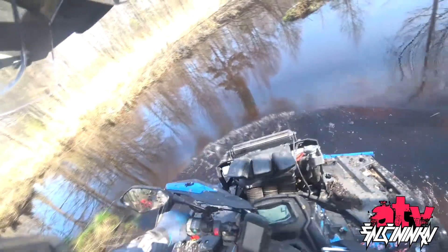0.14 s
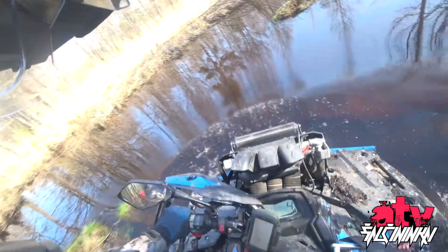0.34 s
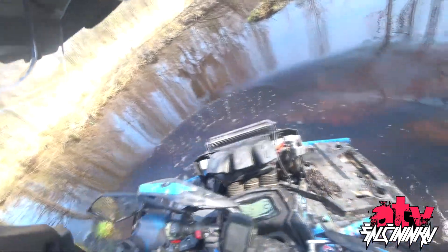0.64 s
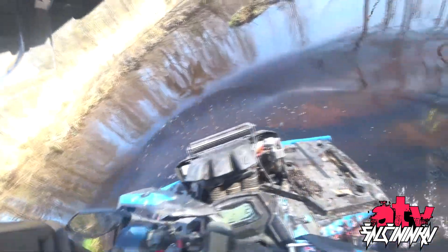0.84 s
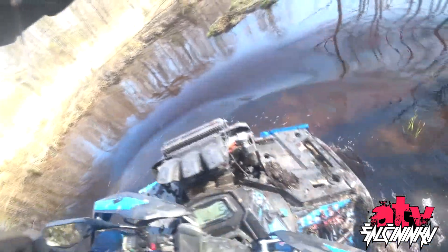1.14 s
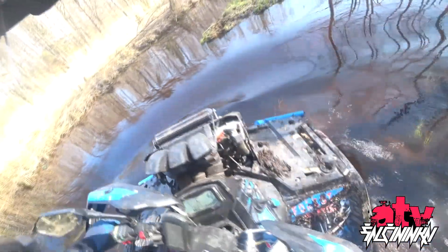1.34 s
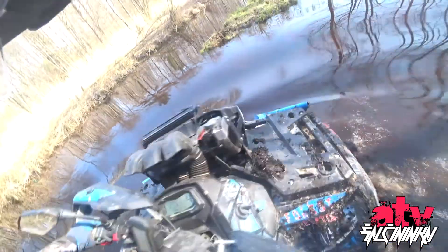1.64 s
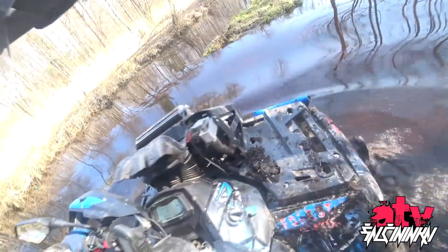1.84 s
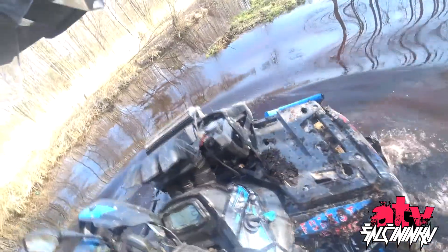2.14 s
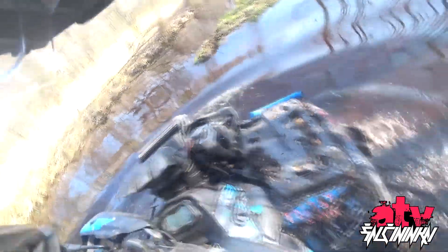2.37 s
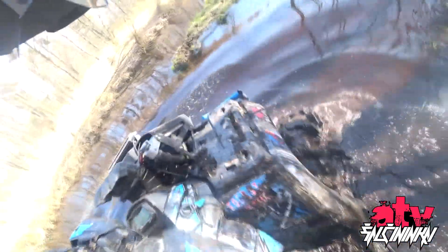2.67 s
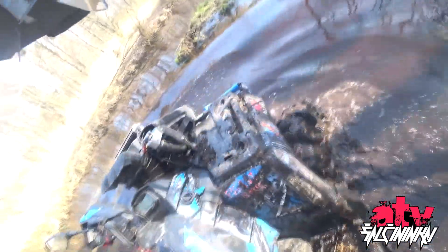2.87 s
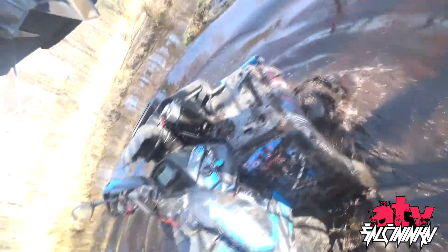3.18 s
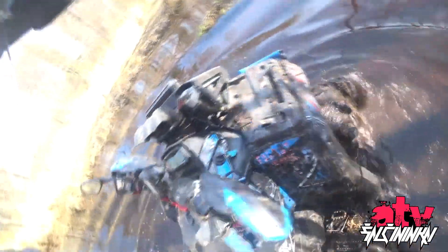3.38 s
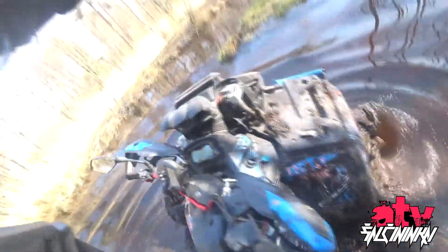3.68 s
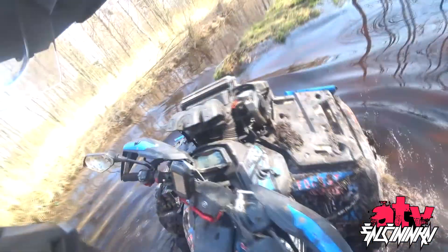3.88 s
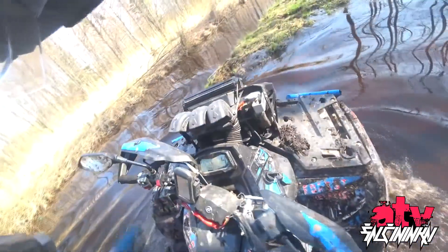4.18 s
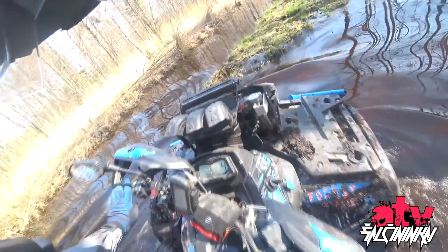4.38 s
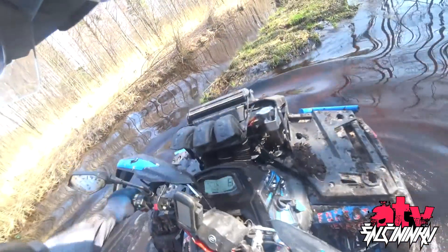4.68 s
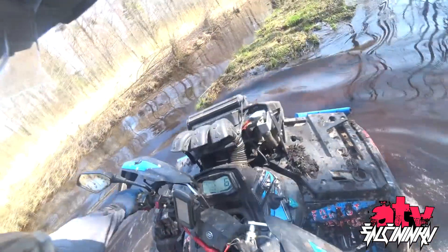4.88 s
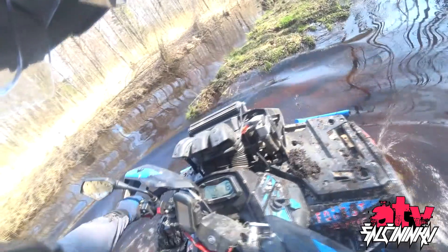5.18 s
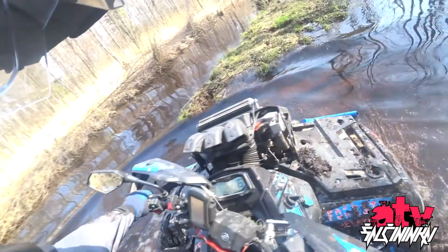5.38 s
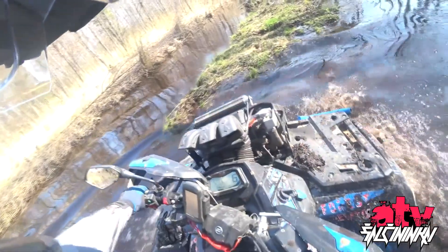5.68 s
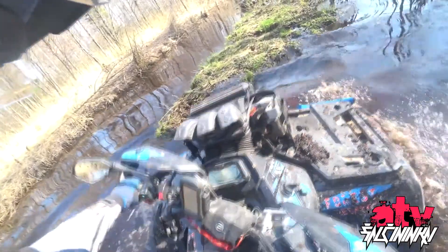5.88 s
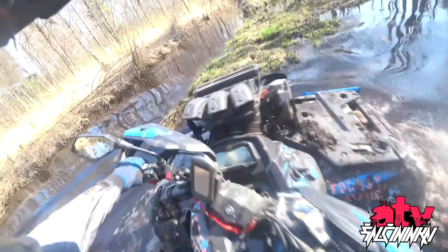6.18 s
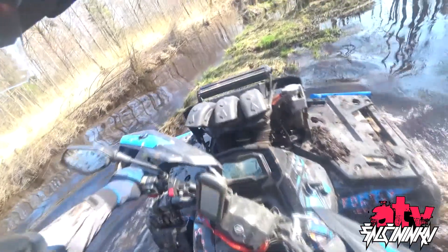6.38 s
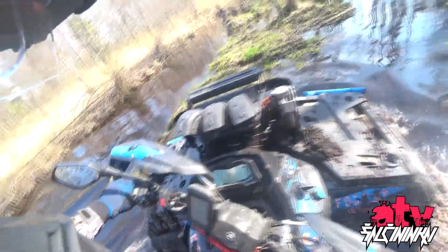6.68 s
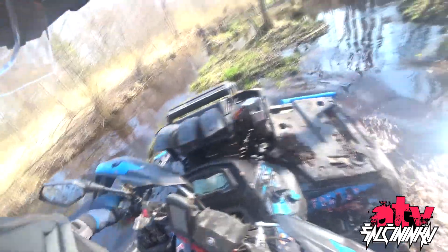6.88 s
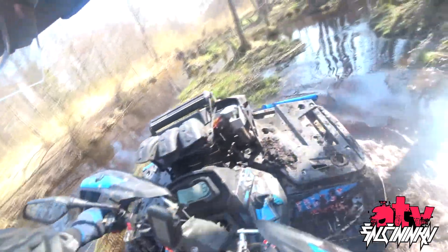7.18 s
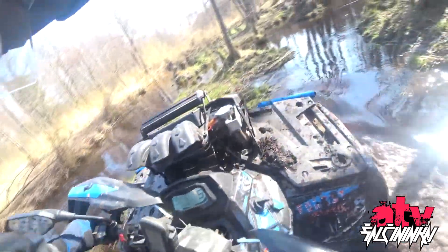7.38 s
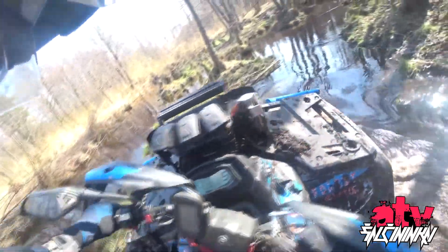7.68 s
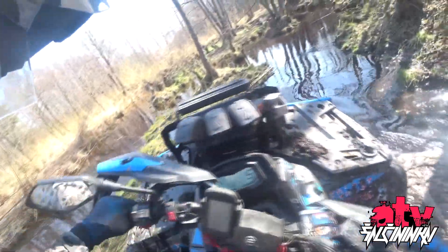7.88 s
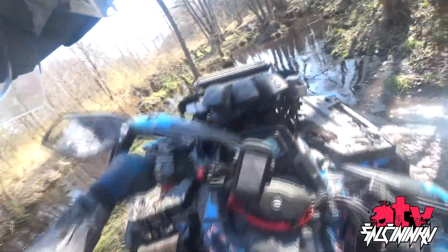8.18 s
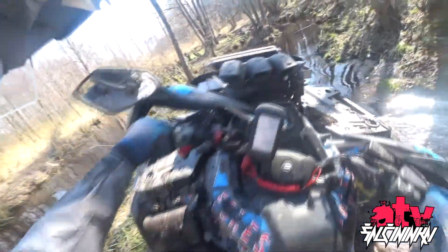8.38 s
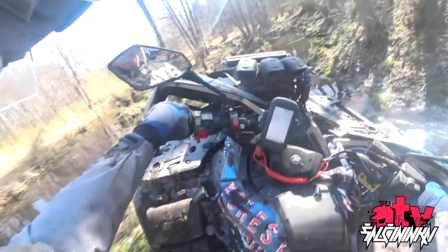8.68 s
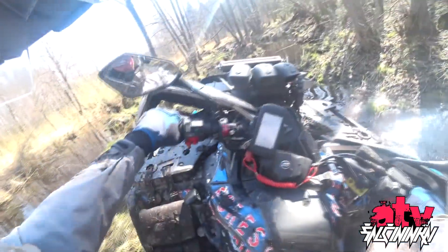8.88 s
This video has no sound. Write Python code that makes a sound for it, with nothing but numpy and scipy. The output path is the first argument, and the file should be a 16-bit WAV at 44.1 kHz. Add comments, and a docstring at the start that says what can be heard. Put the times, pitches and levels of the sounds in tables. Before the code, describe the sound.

A two-cylinder quad bike growls and rattles through flood water, whining at times, while water churns, slaps and gulps against the bodywork.

```python
"""A two-cylinder quad bike wades through flood water, heard by a small camera in a closed housing.
From the start, uneven firings hum in the exhaust as tones and knock ringing frame, panels and racks, over churning
noise; a whine soon takes hold at times, then gulps and puffs of water slap the body and single drops tick.
From about five seconds the engine works harder and the water churns more; late on, brief bands of hiss swell.
The two microphone ports hear each resonance with its own balance and phase."""
import sys
import numpy as np
from scipy import signal
from scipy.io import wavfile
from scipy.ndimage import uniform_filter1d

SR = 44100
rng = np.random.default_rng(int(sys.argv[2]) if len(sys.argv) > 2 else 0)


def unload_audio(sound):
    """Save the sound as a 16-bit wav file, at the path given as the first command line argument."""
    columns = np.transpose(np.atleast_2d(sound))
    # keep every value between -1 and 1, then stretch to whole-number steps
    steps = np.round(np.clip(columns, -1, 1) * 32767)
    wavfile.write(sys.argv[1], SR, steps.astype(np.int16))


def how_loud(loudness_db):
    """Turn decibels into a plain amplitude multiplier (0 dB gives 1, 20 dB gives 10)."""
    steps = np.asarray(loudness_db, float) / 20
    return 10 ** steps


N = 398223
TIME = np.arange(N) / SR

# engine speed: (time [s], rate of the four-stroke cycle [cycles/s])
ENGINE_SPEED = [(0.0, 17.45), (0.34, 21.32), (0.65, 20.39), (0.8, 24.99), (1.3, 25.87), (1.4, 22.41),
                (2.25, 18.38), (2.44, 23.76), (2.74, 22.54), (3.49, 22.63), (3.69, 23.73), (4.24, 22.9),
                (4.75, 25.61), (4.94, 28.98), (5.15, 28.87), (5.37, 31.6), (5.98, 26.13), (6.31, 29.68),
                (6.59, 25.89), (7.36, 27.33), (7.75, 25.08), (8.04, 24.63), (8.2, 20.38), (8.43, 19.22),
                (8.6, 25.77), (8.71, 27.78), (9.03, 26.17)]
# throttle: (time [s], load [dB], looseness of the rattling metal [dB], knock against the steady shaking [dB])
THROTTLE = [(0, -6, -16.5, 4), (.5, -7.5, -16, 9.5), (.75, -5, -8, 3.5), (1.15, -3, -0.5, 7.5),
            (1.35, -4.5, -7, 9), (1.5, -1, -11.5, 5), (1.75, -4.5, -14, -20), (1.95, -10.5, -18, -3),
            (2.185, -11.5, -13, 6), (2.205, -14.5, -7, 15), (2.45, -5, -11, 8.5), (3.3, -6, -7.5, 3.5),
            (4.15, -4.5, -5.5, 3.5), (4.6, -3, -0.5, 5), (5.1, 0, -5, 7.5), (5.5, -0.5, -1.5, 5.5),
            (6.0, -1, 1.5, 9), (6.5, -2, 1, 4.5), (7.55, -0.5, -2, 10), (7.85, -5.5, -1, 9.5),
            (8.05, -3.5, -1, 5.5), (8.09, -4, -5, 4), (8.28, -5.5, -7, 13.5), (8.42, -5, -8, 17),
            (8.55, -0.5, -10.5, 9.5), (9.03, -2, -8.5, 10.5)]
# how hard the wheels churn the water: (time [s], level [dB])
WHEEL_CHURN = [(0, -10), (.5, -11.5), (1.2, -3), (1.45, -6.5), (2.15, -8.5), (2.75, -4.5), (3.8, -3),
               (4.15, -6), (5.5, 1.5), (6.35, -2), (6.95, 0.5), (7.6, -1), (8.2, -7.5), (8.8, -1),
               (9.03, -3.5)]
# spells in which the whine takes hold: (start [s], length [s], boost [dB], pitch [Hz])
WHINE_SPELLS = [(.8, 0.57, 3, 712), (2.3, 1.9, 7, 711), (5.45, 0.22, 7.5, 702), (6.55, 1.126, 6.5, 709),
                (8.45, 0.71, 7.5, 694.7)]


def evened(x):
    """Scales to rms 1."""
    return x / np.sqrt(np.mean(np.abs(x) ** 2) + 1e-20)


def curve(rows, column):
    """One column of a table, joined by straight lines sample by sample."""
    rows = np.array(rows)
    return np.interp(TIME, rows[:, 0], rows[:, column])


def hold(start, length):
    """Rises, holds and falls: 0 to 1."""
    rise_s, fall_s = 0.11, 0.06
    rise = (TIME - start) / rise_s + 0.5
    fall = (start + length - TIME) / fall_s + 0.5
    return np.clip(np.minimum(rise, fall), 0, 1)


def spells(rows):
    """Sum in dB of all spells."""
    return sum(db * hold(start, length) for start, length, db, *_ in rows)


def strength(part):
    """Gain of a part from load, looseness and its own spells."""
    # each part: (gain where load and looseness are 0 dB [dB], share of load, share of looseness)
    follows = {"exhaust": (-43.5, 0.85, 0.06), "frame": (-35.5, 1, 0.046), "panels": (-38.5, 0.9, 0.29),
               "rack": (-41.5, .05, 0.9), "bracket": (-44, 0.25, 0.97), "clatter": (-48.5, 0.059, 1),
               "low bar": (-48.5, 0.71, 0.49), "high bar": (-48.5, .05, 0.75), "whine": (-48, 0.68, .05)}
    # spells in which one part buzzes harder: (start [s], length [s], boost [dB])
    buzzes = {"exhaust": [(6.3, 0.72, 3), (8.45, .3, 4)], "frame": [(0, 0.26, 1), (8.5, .6, 0.5)],
              "panels": [(5.0, 0.53, 3)], "rack": [(.55, 0.31, 6.5), (3.65, 0.42, 6), (4.35, 0.18, 6),
              (6.55, 1.33, 3), (8.2, 0.22, 0)], "bracket": [(.95, 0.35, 4), (4.0, 0.29, 3), (5.35, 0.21, 7),
              (5.85, 1.36, 5.5)], "clatter": [(0, 0.81, 5), (5.3, 1.0, 2.5), (7.6, .45, 2),
              (8.45, 0.73, 12)], "low bar": [(.8, 0.66, 3.5), (6.1, .4, 0)], "high bar": [(2.45, 2.35, 5.5),
              (6.8, 0.73, 3)]}
    db, of_load, of_loose = follows[part]
    load, looseness = curve(THROTTLE, column=1), curve(THROTTLE, column=2)
    own_db = spells(buzzes.get(part, WHINE_SPELLS))
    return how_loud(db + of_load * load + of_loose * looseness + own_db)


def hiss_drive():
    """Steady white noise that sets a resonance ringing."""
    return rng.standard_normal(N)


def ring(drive, modes):
    """Resonances, each calling for its own drive and reaching the two ports with its own balance and phase."""
    out = np.zeros((2, N))
    for hz, width, db, balance_db, lead in modes:
        turn = np.exp(2j * np.pi * np.cumsum(hz * np.ones(N)) / SR)  # the pitch may move
        poles = np.exp(-np.pi * width * np.array([1, 4, 6]) / SR)
        # shift the resonance down to 0 Hz, filter there, shift it back
        lowered = signal.lfilter([1], np.poly(poles), drive() * turn.conj())
        ringing = evened(turn * lowered)
        balance = how_loud([balance_db / 2, -balance_db / 2])
        phase = np.exp([0.5j * lead, -0.5j * lead]) * np.exp(2j * np.pi * rng.random())
        ports = balance * phase
        out += how_loud(db) * (ports[:, None] * ringing).real
    return evened(out)


def firings(cycles, spread_db):
    """One click a firing, of uneven size; rows are the cylinders."""
    # where in the four-stroke cycle each cylinder fires: [share of a cycle]
    firing_points = [.18, .53]
    out = np.zeros((2, N))
    for row, share in zip(out, firing_points):
        at = np.flatnonzero(np.diff(np.floor(cycles - share)))
        row[at] = how_loud(spread_db * rng.standard_normal(400))[:len(at)]
    return out


def exhaust(cycles):
    """Clean orders of the cycle rate, wavering in level and coloured by pipe and frame."""
    # harmonics of the engine: (multiple of the cycle rate, relative level [dB])
    engine_orders = [(4, -4), (5, 13.5), (6, 8), (7, -.5), (8, 4), (9, 4), (10, -1), (11, 3), (12, 0),
                     (13, 2.5), (14, 8.5), (15, -6), (16, 2.5), (17, 2.5), (18, -5), (19, -1), (20, .5),
                     (21, -7), (22, 2), (23, -5), (24, -1.5), (25, -1), (26, -2), (27, -1), (28, -2),
                     (29, -4), (30, -2), (31, -7)]
    # colour of pipe and frame: (frequency [Hz], relative level [dB], phase by which left leads [rad])
    pipe_colour = [(90, -13, -.3), (120, -9, -.4), (150, -13.5, -.4), (170, -6, -.3), (187, 5, -.2),
                   (205, 1, -.4), (235, 2, -1.1), (270, -12, 0), (320, -6, .5), (370, -6, .2),
                   (440, -8, .7), (520, -3.5, 1.2), (570, 7, 1.7), (630, 7, 2.6), (700, 18, 2.6),
                   (760, 13, 2.8), (860, 0, 2.6)]
    pipe_hz, pipe_db, pipe_lead = np.transpose(pipe_colour)
    out = np.zeros((2, N))
    for order, db in engine_orders:
        waver = np.interp(TIME, np.arange(60) / 6, rng.standard_normal(60))
        hz = order * curve(ENGINE_SPEED, column=1)
        lead = np.interp(hz, pipe_hz, pipe_lead) * np.array([[0.5], [-0.5]])
        level = how_loud(db + np.interp(hz, pipe_hz, pipe_db) + 3 * waver)
        out += level * np.cos(2 * np.pi * (order * cycles + rng.random()) + lead)
    return strength("exhaust") * evened(out) * how_loud([[-0.8], [0.8]])


def pipe_boom():
    """A low resonance of the pipe under noise, louder while the engine gains speed."""
    gained = np.maximum(np.gradient(curve(ENGINE_SPEED, column=1)) * SR, 0)
    pickup = uniform_filter1d(gained, size=4000)  # cycles/s gained each second
    return how_loud(-63 + 0.2119 * pickup) * ring(hiss_drive, [(181.5, 20, 0, -4.0, -0.22)])


def shaking(clicks, first_db, depth, decay_s, clean):
    """A sharp blow at each firing, plus noise that bursts with it and dies back to a steady rattle."""
    # spells in which the first cylinder knocks softer or harder: (start [s], length [s], change [dB])
    first_knock = [(.6, 1, 0.5), (2.3, .4, -0.5), (3.2, .6, 1.5), (5.0, 0.74, -2), (8.15, 0.285, -21)]
    t = np.arange(2000) / SR
    burst = (1 - np.exp(-t / 0.00054)) * np.exp(-t / decay_s)
    blows = clicks[0] * how_loud(first_db + spells(first_knock)) + clicks[1]
    blows = blows * depth * how_loud(curve(THROTTLE, column=3))
    swell = 1 + signal.oaconvolve(blows, burst)[:N]
    steady = 1 / np.sqrt(uniform_filter1d(swell ** 2, 6000))  # evens out the slower level
    return lambda: steady * (swell * rng.standard_normal(N) + clean * blows)


def bodywork(clicks):
    """Each metal or plastic part rings with the knocks, at its own depth and level."""
    # resonances of each part:
    # (pitch [Hz], width [Hz], relative level [dB], left over right [dB], phase by which left leads [rad])
    frame = [(501, 68, -17, 2, 0.3), (567.3, 28, -9, 4, 1.4), (693, 48.4, 0, -5, 2.84),
             (737, 41, -2.5, -0.5, 2.9), (777, 44, -6, 3, 2.68), (900, 53, -13.5, 9, 1.85)]
    panels = [(951, 65, -7.5, 5.8, 3), (1149, 70, -7.5, 2.4, -1.43), (1263, 43, -2.5, 3.2, -2.5),
              (1380, 310, -22, 0.69, -2), (1436, 55, 0, 0.71, -3)]
    rack = [(1705.6, 41.7, -2.5, 0.5, 1.65), (1944, 146, -9, -6.5, 3.46)]
    bracket = [(2042, 39, -2, -1.1, 2.71), (2204, 74, -9, -1, 3.92)]
    clatter = [(2624, 92, -9.5, -10, 0.5), (2680, 62, 5, 5.5, 3.5), (2866, 100, 7, -0.5, 2.0),
               (3405, 115, -10, 5, -2)]
    low_bar = [(1600.4, 49, 0, 3.4, 0.3)]
    high_bar = [(1823.6, 33.7, 0, 3.0, 1.0)]
    # (name, resonances, first cylinder dB, burst depth, burst decay s, weight of the sharp blow)
    parts = [("frame", frame, -1.5, 0.52, 0.005, 40),
             ("panels", panels, -0.6, 0.4, 0.005, 14),
             ("rack", rack, -0.6, 0.9, 0.004, 40),
             ("bracket", bracket, -5, 1.1, 0.004, 32),
             ("clatter", clatter, 1.5, 0.8, 0.004, 18),
             ("low bar", low_bar, 0, 0.6, 0.005, 40),
             ("high bar", high_bar, 0, 0.5, 0.0045, 45)]
    return sum(strength(name) * ring(shaking(clicks, *how), modes) for name, modes, *how in parts)


def whine(cycles, clicks):
    """A narrow resonance struck by the firings, which also picks out the clean orders nearest its pitch."""
    middles = [start + length / 2 for start, length, *_ in WHINE_SPELLS]
    pitch = np.interp(TIME, middles, [hz for *_, hz in WHINE_SPELLS])
    orders = sum(np.cos(2 * np.pi * (order * cycles + rng.random())) for order in range(22, 36))
    struck = ring(shaking(clicks, -2, 0.3, 0.006, 70), [(pitch, 16, 0, -2, 1.9)])
    picked_out = ring(lambda: orders, [(pitch, 30, 0, -2, 1.9)])
    return strength("whine") * (struck + 1.2 * picked_out)


def slaps():
    """Water slaps the body: a puff of band-limited noise and a rising gulp of trapped air."""
    # (time [s], gulp level ahead of its envelope [dB], starting pitch of the gulp [Hz], puff over gulp [dB])
    slap_events = [(1.238, -42, 507, 11.5), (1.621, -38, 458, 1), (2.566, -35, 487, -8),
                   (2.79, -40, 460, -2), (2.81, -38.5, 482, 8.5), (2.886, -41.5, 526, 12.5),
                   (4.748, -35, 443, -7), (4.87, -39, 463, 1), (5.077, -42, 556, 5), (6.547, -30, 505, -4)]
    out, t = np.zeros((2, N + 8000)), np.arange(8000) / SR
    for s, db, hz, puff_db in slap_events:
        noise = rng.standard_normal((2, 8000))
        puff = evened(signal.lfilter(*signal.butter(3, [600, 1900], "bandpass", fs=SR), noise))
        puff = puff * how_loud(puff_db - 60 * t / 0.065) * (1 - np.exp(-t / 0.002))
        gulp = np.sin(2 * np.pi * hz * (t + 0.82 * t ** 2) + np.array([[0], [1.2]]))
        gulp *= how_loud(-60 * t / 0.079) * (1 - np.exp(-t / 0.0009))
        out[:, round(s * SR):][:, :8000] += how_loud(db) * (gulp + puff)
    return out[:, :N]


def drops():
    """Single drops tick on the plastic as short dying tones."""
    # (time [s], peak level [dB], pitch [Hz])
    drop_events = [(3.2674, -42, 4470), (3.6706, -34.5, 5060), (3.9515, -38, 5180), (4.4477, -44, 5370),
                   (5.5664, -49, 5200), (6.675, -28.5, 5300)]
    out, t = np.zeros((2, N)), np.arange(600) / SR
    for s, db, hz in drop_events:
        tone = np.sin(2 * np.pi * hz * t + np.array([[0], [1.8]]))
        out[:, round(s * SR):][:, :600] += how_loud(db - 60 * t / 0.031) * tone
    return out


def port_spray(clicks, spray):
    """Spray hisses in the resonances of the microphone ports, pulsing with the firings."""
    # (pitch [Hz], width [Hz], relative level [dB], left over right [dB], phase by which left leads [rad])
    port = [(5227, 410, 6.5, -3.5, 1.85), (5680, 450, -5, -5, 1.1), (4440, 300, -11, 0, 2.4)]
    level = how_loud(-46 + curve(WHEEL_CHURN, column=1))
    return level * spray * ring(shaking(clicks, -6, 0.63, 0.012, 5.5), port)


def wash():
    """Broad churning noise in drifting patches, with treble flicker where spray lands."""
    # colour of churned water, relative levels per Hz:
    # (frequency [Hz], in phase at both ports [dB], in opposite phase [dB])
    wash_colour = [(25, -24, -34), (45, -37, -37), (96, -33, -15), (130, -11, -13), (197, -1, -4),
                   (304, -1, -0.5), (460, -5, -3.5), (940, 1.5, -1.5), (2050, -4.5, 8), (2410, -7, -7.5),
                   (3820, -14, -6), (7300, -14.5, -16.5), (9100, -20.5, -23), (10000, -17.5, -21)]
    frames, hz = N // 128 + 5, np.fft.rfftfreq(512, 1 / SR)
    a, b, c, d, patches = rng.standard_normal((frames, 257, 5)).T
    patches = uniform_filter1d(patches, 6, 0)  # smooth over frequency
    patches = evened(uniform_filter1d(patches, 20, 1))  # smooth over time
    flicker = np.minimum(rng.exponential(1, frames), 5) * np.clip(hz[:, None] / 4000, 0, 1)
    f, same_db, opposite_db = np.transpose(wash_colour)
    colour = np.array([np.interp(np.log(hz + 1), np.log(f), db) for db in (same_db, opposite_db)])
    spectrum = np.array([a + 1j * b, c + 1j * d])
    spectrum = spectrum * how_loud(colour[:, :, None] + 1.47 * patches + 1.28 * flicker)
    same, opposite = signal.istft(spectrum, nperseg=512, noverlap=384)[1][:, :N]
    level_db = -42.5 + 0.48 * curve(WHEEL_CHURN, column=1) + 0.2 * curve(THROTTLE, column=1)
    return how_loud(level_db) * evened(np.array([same + opposite, same - opposite]))


def hisses():
    """Brief bands of noise, perhaps spray."""
    # (start [s], length [s], level [dB], centre [Hz], width [Hz])
    hiss_bands = [(7.62, .45, -55, 2350, 350), (8.52, .55, -64.5, 7100, 300)]
    return sum(how_loud(db) * hold(start, length) * ring(hiss_drive, [(hz, width, 0, 0, 1)])
               for start, length, db, hz, width in hiss_bands)


def mud_rumble():
    """Wheels in mud: low resonant noise, swelling on rougher ground."""
    # rougher ground: (start [s], length [s], boost [dB])
    rough_ground = [(4.72, .2, 11), (1.4, 3.1, 2), (7.8, 1.0, 3)]
    return how_loud(-73 + spells(rough_ground)) * ring(hiss_drive, [(77.0, 53, 0, -0.7, 0)])


def scene():
    """Engine, bodywork and water together."""
    cycles = np.cumsum(curve(ENGINE_SPEED, column=1)) / SR
    clicks = firings(cycles, spread_db=1.5)
    # spray comes in gushes
    spray = how_loud(1.6 * np.interp(TIME, np.arange(200) / 20, rng.standard_normal(200)))
    engine = exhaust(cycles) + pipe_boom()
    body = bodywork(clicks) + whine(cycles, clicks)
    water = slaps() + drops() + port_spray(clicks, spray) + wash() * spray ** 0.17 + hisses()
    return engine + body + water + mud_rumble()


def roll_off(x):
    """The treble ends steeply here."""
    return signal.sosfilt(signal.butter(12, 12370, fs=SR, output="sos"), x)


def record(dry):
    """The camera's gentle low cut at 60 Hz and steep band limit at 11070 Hz."""
    thinned = signal.lfilter(*signal.butter(1, 60, "highpass", fs=SR), dry)
    band_limit = signal.firwin(511, 11070, window=("kaiser", 9), fs=SR)
    finished = signal.oaconvolve(thinned, band_limit[None], "same")
    return roll_off(finished)


dry = scene()
out = record(dry)
unload_audio(out)
```